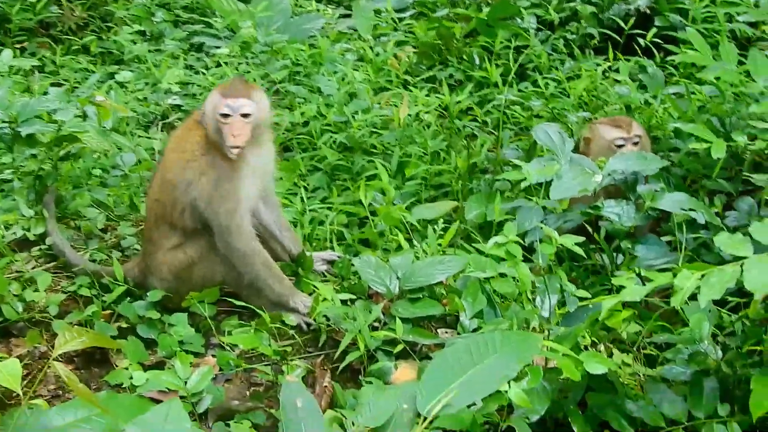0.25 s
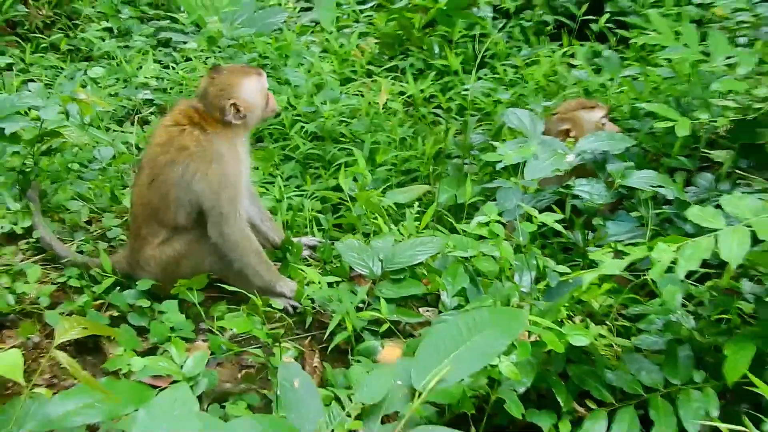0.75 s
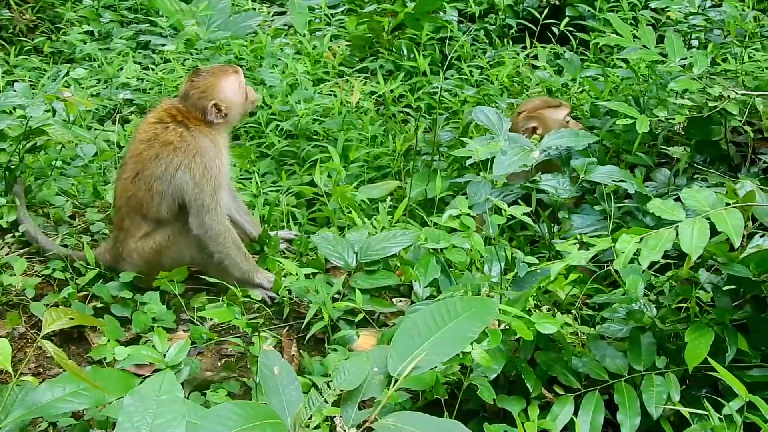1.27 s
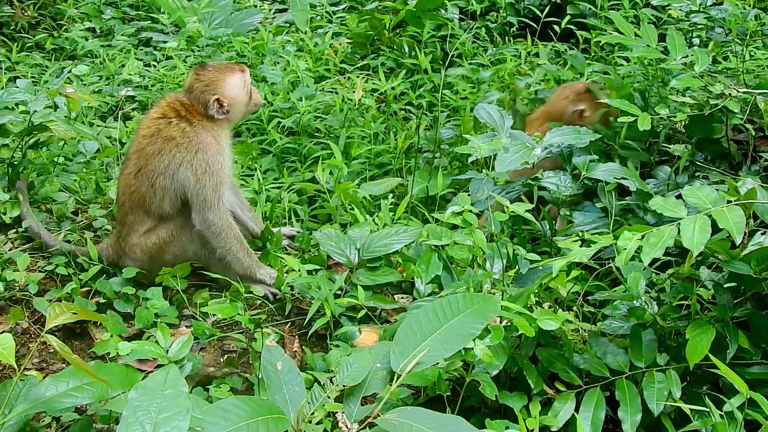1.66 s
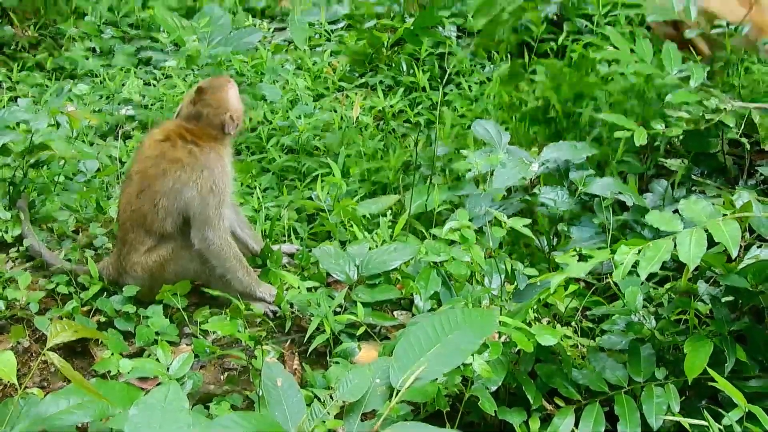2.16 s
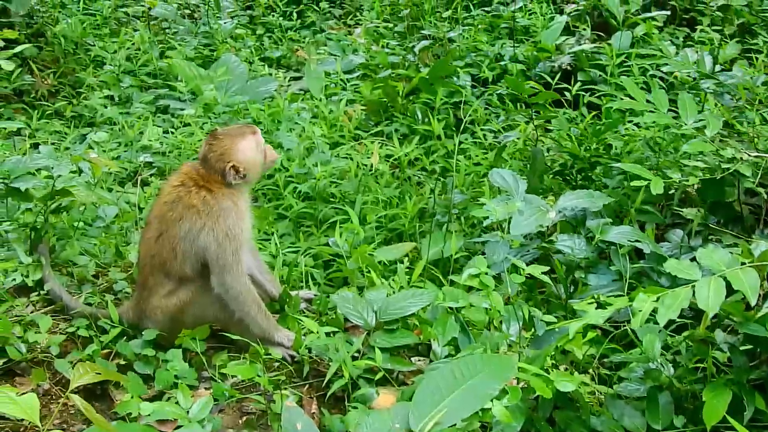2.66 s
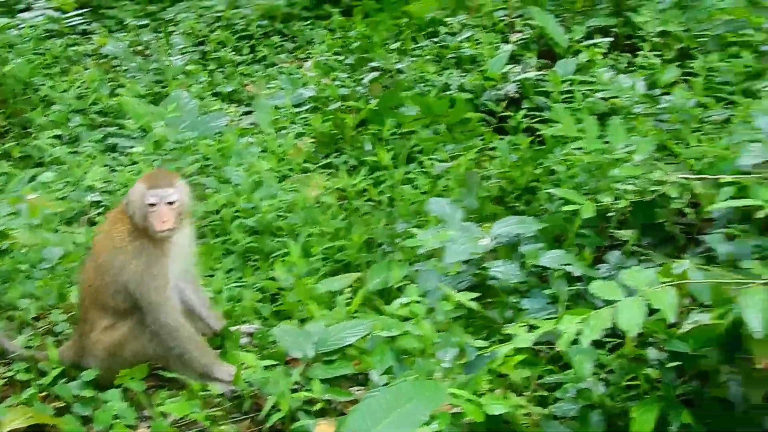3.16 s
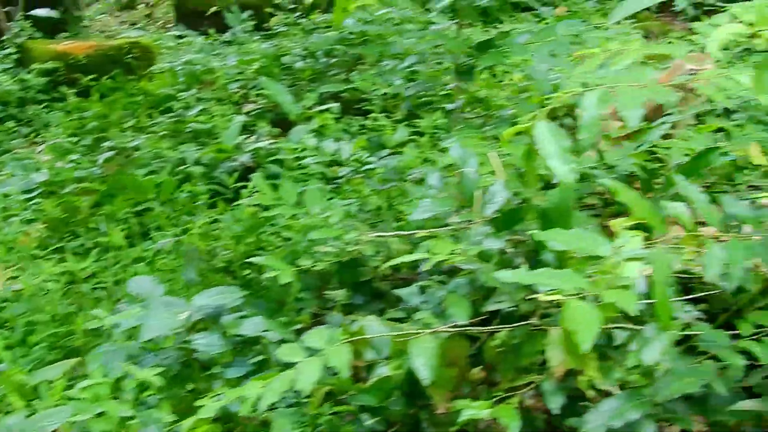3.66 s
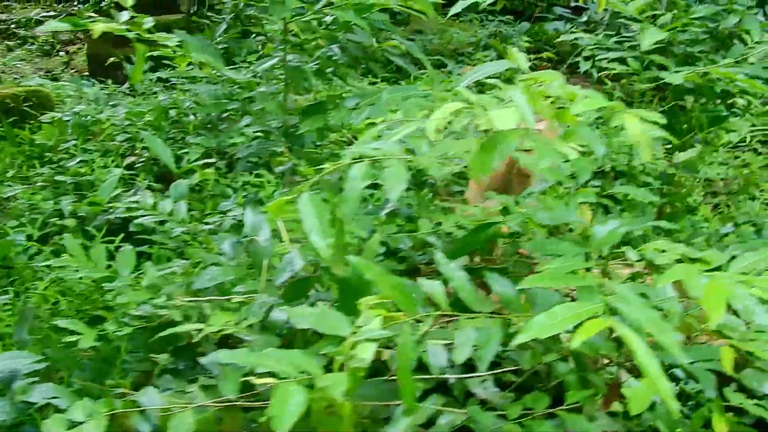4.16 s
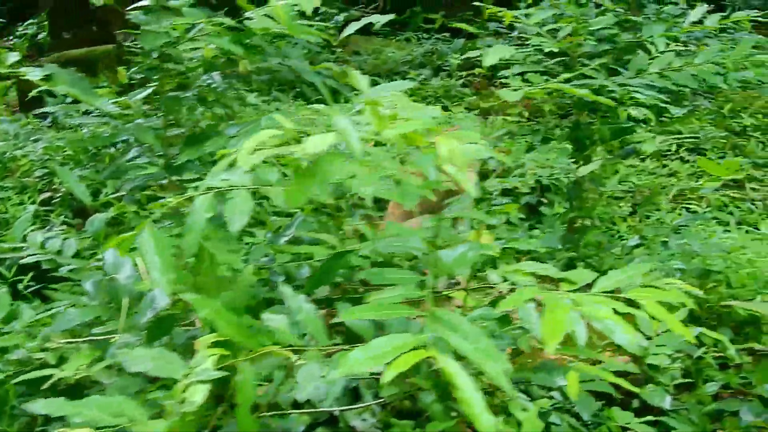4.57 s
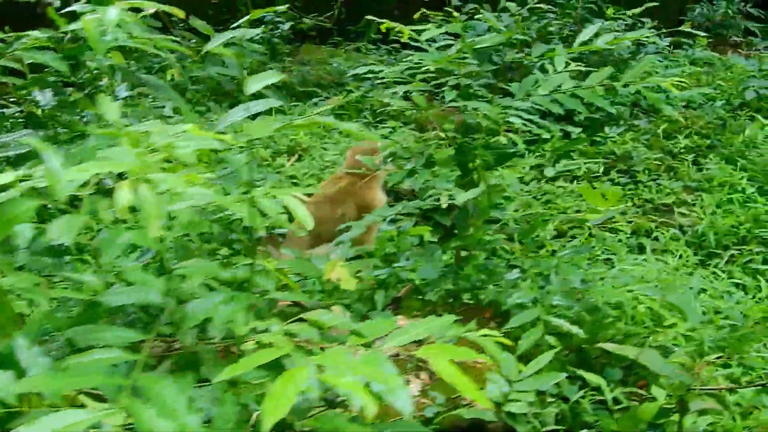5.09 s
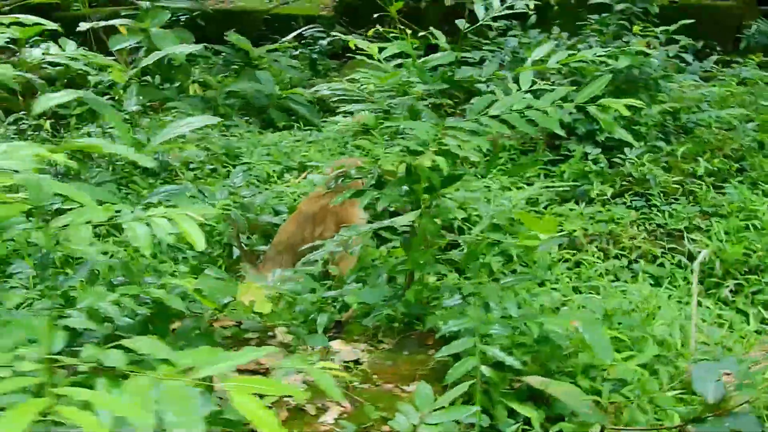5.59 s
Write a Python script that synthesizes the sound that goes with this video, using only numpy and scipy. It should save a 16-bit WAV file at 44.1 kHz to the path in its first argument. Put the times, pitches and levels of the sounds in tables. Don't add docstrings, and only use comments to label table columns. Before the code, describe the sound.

A young monkey shrieks eight times in a forest, thin piercing whistles swooping and breaking into rasp, over a quiet distant engine and small leaf rustles.

```python
import sys
import numpy as np
from scipy import signal
from scipy.fft import rfft, irfft
from scipy.io import wavfile
from scipy.ndimage import uniform_filter1d

SR = 44100
rng = np.random.default_rng(int(sys.argv[2]) if len(sys.argv) > 2 else 0)


def amplitude_ratio(level_db):
    exponent = np.asarray(level_db, float) / 20
    return 10 ** exponent


def persist_wave(psi):
    counts = np.round(np.clip(psi, -1, 1) * 32767).astype(np.int16)
    wavfile.write(sys.argv[1], SR, np.atleast_2d(counts).T)


N = 257103
LEAD = SR // 4


def rms_one(x):
    return x / np.sqrt(np.mean(x ** 2) + 1e-20)


def at_hz(points, hz):
    point_hz, value = np.transpose(points)
    return np.interp(np.log(hz), np.log(point_hz), value)


def in_time(rows, t):
    s, *columns = np.transpose(rows)
    return [np.interp(t, s, c) for c in columns]


def gate(t, start, end, edge_s):
    return np.clip(np.minimum(t - start, end - t) / edge_s, 0, 1)


def filtered(x, order, hz, kind="low"):
    return signal.sosfilt(signal.butter(order, hz, kind, fs=SR, output="sos"), x)


def drift(rate_hz, size=N):
    r = np.exp(-2 * np.pi * rate_hz / SR)
    return rms_one(signal.lfilter([1], [1, -2 * r, r * r], rng.standard_normal(size + SR))[SR:])


def resonant_noise(peaks, size=N, patchy_db=0):
    white, out = rng.standard_normal(size + 4000), 0
    for k, (hz, width_hz, db) in enumerate(peaks):
        r = np.exp(-np.pi * width_hz / SR)
        b, a = [1, 0.002, -1], [1, -2 * r * np.cos(2 * np.pi * hz / SR), r * r]
        swell = amplitude_ratio(db + patchy_db * drift(14.5, size=size))
        ringing = signal.lfilter(b, a, signal.lfilter(b, a, white))[4000:]
        out = out + (-1) ** k * swell * rms_one(ringing)
    return rms_one(out)


def coloured(spectrum, channels):
    hz = np.arange(N // 2 + 1) * SR / N + 1
    return rms_one(irfft(rfft(rng.standard_normal((channels, N))) * amplitude_ratio(at_hz(spectrum, hz)), N))


def spread(mid, side, side_db, pan_db):
    signs = np.array([[1], [-1]])
    return (mid + amplitude_ratio(side_db) * side * signs) * amplitude_ratio(signs * pan_db / 2)


def forest_air():
    # (time [s], level [dB])
    breeze = [(0, -76), (.37, -75.5), (1.88, -76), (2.81, -71), (5.83, -72)]
    # (frequency [Hz], density [dB per Hz])
    air_spectrum = [(250, 2), (500, -1.5), (1000, -1.5), (1500, -3), (2200, -6.5), (3200, -7.5), (5000, -3),
                    (8000, -11.5), (10000, -24), (15000, -32)]
    air_db, = in_time(breeze, np.arange(N) / SR)
    level = amplitude_ratio(air_db - 1.5 + 2.5 * drift(15))
    air, air_side = level * coloured([(150, 0.41)] + air_spectrum, channels=2)
    return spread(air, air_side, -12.0, 0.19)


def engine():
    # (time [s], level [dB])
    engine_curve = [(0, -79.5), (.37, -73), (1.88, -73.5), (2.81, -74.5), (5.83, -75.5)]
    # (frequency [Hz], width [Hz], level [dB])
    drone_peaks = [(101.4, 14, 4), (128.7, 7.4, -1.5), (154.8, 18, -2.5), (186.5, 68, -4)]
    drone_db, = in_time(engine_curve, np.arange(N) / SR)
    deep = amplitude_ratio(drone_db + 0.5) * resonant_noise([(54.7, 3.0, -0.46), (66.4, 14, -0.54)], patchy_db=5.0)
    drone = amplitude_ratio(drone_db) * resonant_noise(drone_peaks, patchy_db=5.0)
    low_side = amplitude_ratio(-92.5) * resonant_noise([(69.5, 46, 26), (164, 56, 25)])
    return spread(deep + drone, low_side, 0, 0.47)


def hums():
    # (start [s], end [s], frequency [Hz], level [dB])
    hum_rows = [
        (3.036, 3.217, 75, -68),
        (3.477, 3.862, 76.1, -70.5),
        (4.101, 4.953, 128.1, -76.5),
        (4.104, 5.9, 159.3, -75.5),
        (4.133, 5.894, 195.6, -80),
    ]
    t, out = np.arange(N) / SR, np.zeros(N)
    for start, end, hz, db in hum_rows:
        level = amplitude_ratio(db + 1.6 * drift(1.04)) * gate(t, start, end, 0.048)
        out += level * np.sin(2 * np.pi * hz * t + 0.84 * drift(1.0))
    return np.sqrt(2) * out


def motor_whine():
    # (time [s], level [dB])
    whine_curve = [(0, -100), (.9, -79.5), (1.2, -74.5), (1.5, -92), (2.8, -72.5), (4.0, -80), (4.5, -69.5),
                   (5.2, -80.5), (5.5, -72.5), (5.83, -74)]
    # (frequency [Hz], level [dB])
    whine_lines = [(332, -14), (663, -18), (994, -19.5), (1329, -11), (1655, -43)]
    t = np.arange(N) / SR
    lines = sum(amplitude_ratio(db + 3.4 * drift(4.9)) * np.sin(2 * np.pi * hz * t) for hz, db in whine_lines)
    return spread(amplitude_ratio(in_time(whine_curve, t)[0]) * lines, 0, 0, 0.47)


def rustles():
    # (time [s], level [dB], centre [Hz], width [octaves], length [s])
    rustle_rows = [(0.484, -67, 817, 3.5, 0.0095), (0.481, -63, 197.7, 0.32, 0.022),
                   (0.72, -56.5, 208, 0.17, 0.037), (0.721, -66, 716, 0.89, 0.048),
                   (0.972, -55.5, 201, 0.19, 0.043), (0.973, -61.5, 652, 0.88, 0.031),
                   (1.024, -68.5, 733, 0.59, 0.026), (2.178, -76, 790, 1.3, 0.11),
                   (2.455, -69.5, 1000, 1.9, 0.093), (2.757, -64.5, 1036, 0.8, 0.077),
                   (2.77, -73, 410, 0.31, 0.064), (3.246, -67, 480, 1.1, 0.0096),
                   (4.362, -70.5, 1313, 0.21, 0.014), (4.399, -71.5, 1370, 0.22, 0.034),
                   (4.406, -66.5, 5600, 0.11, 0.05), (4.409, -71, 6700, 0.26, 0.047),
                   (4.41, -89, 10400, 0.22, .025), (4.414, -74, 2470, 0.36, 0.04),
                   (4.477, -67, 5420, 0.088, 0.047), (4.478, -68, 6700, 0.23, 0.024),
                   (4.475, -70.5, 2400, 0.28, 0.026), (4.598, -74, 1890, 0.13, 0.025),
                   (4.5, -68.5, 835, 2.6, 0.086), (4.529, -65, 5460, 0.41, 0.018),
                   (4.561, -67, 5300, 0.39, 0.007), (4.566, -73, 5300, .3, 0.035),
                   (4.716, -67.5, 1220, 0.38, 0.033), (5.123, -66.5, 946, 0.51, 0.014),
                   (5.316, -73.5, 748, 0.49, 0.07), (5.664, -71.5, 1080, 0.23, 0.051),
                   (5.682, -77, 5940, 0.84, 0.03)]
    out, t = np.zeros(N), np.arange(SR // 5) / SR
    for s, db, hz, octaves, length_s in rustle_rows:
        grains = rng.standard_normal(len(t)) * amplitude_ratio(7 * rng.standard_normal(len(t)))
        band_hz = [hz * 2 ** (-octaves / 2), hz * 2 ** (octaves / 2)]
        swell = 3 * t / length_s * np.exp(1 - 3 * t / length_s)
        puff = rms_one(filtered(grains, 2, band_hz, "band")) * swell
        at = round(s * SR)
        out[at:at + len(t)] += amplitude_ratio(db) * puff[:N - at]
    return spread(out, np.roll(out, 40), -15.5, 0.24)


def trees(x):
    # (frequency [Hz], decay by 60 dB [s])
    trees_t60 = [(1500, .9), (3000, 1.05), (6000, 1.0), (8000, .8), (10000, .65), (14000, .6)]
    onset_s, near_db, near_s = .032, 2, .08
    sway_samples, sway_hz = 13, 30
    sheen = 0.06
    t = np.arange(SR) / SR
    echo, edges_hz = 0, 1000 * 2 ** np.arange(0, 4.1, .5)
    for low, high in zip(edges_hz, edges_hz[1:]):
        band = filtered(rng.standard_normal((2, SR)), 2, [low, high], "band")
        echo = echo + band * amplitude_ratio(-60 * t / at_hz(trees_t60, np.sqrt(low * high)))
    echo *= (1 - np.exp(-(t / onset_s) ** 2)) * (1 + amplitude_ratio(near_db) * np.exp(-t / near_s))
    echo /= np.sqrt(np.sum(echo[0] ** 2))
    i = np.arange(len(x))
    x = np.interp(i + sway_samples * drift(sway_hz, size=len(x)), i, x)
    x = np.convolve(x, [-sheen, 1 + 2 * sheen, -sheen], "same")
    return amplitude_ratio(-12.5) * signal.fftconvolve(x[None], echo, axes=1)[:, LEAD:LEAD + N]


def leaves_near(x):
    taps = np.zeros((2, SR // 250))
    for row in taps:
        row[rng.integers(8, len(row), size=10)] = rng.choice([-1, 1], size=10) / np.sqrt(10)
    return signal.fftconvolve(x[None], taps, axes=1)[:, :N] * amplitude_ratio([[-10], [-8]])


def squeak(s, rise_s, from_hz, top_hz, db):
    return [(s, from_hz, db, .03), (s + rise_s, top_hz, db - 9, .35)]


def fall(s, length_s, from_hz, sag_s, db):
    # (pitch [Hz], roughness [0-1])
    fall_rough = [(2000, .22), (2500, .22), (3000, .5), (3600, .5), (4400, .3), (7000, .25)]
    shelf_hz, end_hz, fade_db = 3100, 1750, 7
    u = np.linspace(0, 1, num=20)
    hz = shelf_hz + (end_hz - shelf_hz) * u + (from_hz - shelf_hz) * np.exp(-u * length_s / sag_s)
    return list(zip(s + u * length_s, hz, db - fade_db * u, at_hz(fall_rough, hz)))


def score():
    # (start [s], rise [s], from [Hz], top [Hz], effort [dB])
    squeak_rows = [
        (1.262, .058, 6400, 9190, -45.5),
        (2.197, .033, 7400, 7750, -55),
        (3.025, .04, 6854, 9346, -57),
        (3.774, .059, 6380, 8890, -43.5),
        (4.712, .058, 6910, 10140, -51),
    ]
    # (start [s], length [s], from [Hz], time constant [s], effort [dB])
    fall_rows = [
        (1.512, .095, 7110, .017, -42),
        (3.263, .112, 6800, .022, -41.5),
        (4.018, .082, 5450, .017, -41),
        (5.105, .1, 6300, .016, -43),
    ]
    # (time [s], pitch [Hz], effort [dB], roughness [0-1])
    broken_falls = [
        [(.124, 8870, -39, 0.32), (.13, 7000, -35.5, 0.17), (.145, 4950, -37.5, 0.13),
         (.154, 4000, -45.5, 0.12), (.17, 3850, -38.5, 0.34), (.18, 2980, -44.5, 0.33),
         (.197, 2426, -41.5, 0.17), (.23, 1940, -59, 0.2)],
        [(.781, 7750, -40, 0.25), (.79, 6316, -35.5, 0.36), (.808, 4200, -45.5, 0.22),
         (.815, 3240, -38.5, 0.35), (.84, 2859, -50.5, 0.4), (.852, 2550, -41, 0.12), (.866, 2336, -47, 0.21),
         (.875, 1977, -52, 0.35), (.895, 1704, -40, 0.42)],
        [(2.243, 7030, -41.5, 0.24), (2.25, 6080, -53, 0.32), (2.256, 4440, -39.5, 0.3),
         (2.263, 4050, -52, 0.6), (2.264, 2590, -36.5, 0.07), (2.271, 2377, -46.5, 0.15),
         (2.281, 2096, -45.5, 0.18), (2.3, 2170, -47, 0)],
    ]
    openings = [
        [(0, 3250, -43, 0.49), (.045, 4480, -45, 0.6), (.048, 6800, -41, 0.35), (.07, 7000, -44, 0.7),
         (.095, 11000, -44, 0.5), (.113, 10200, -50, 0.75), (.116, 7500, -37, 0.2), (.121, 7500, -39, 0.3)],
        [(.531, 7080, -46.5, 0), (.547, 7320, -43.5, 0), (.557, 8570, -44.5, 0.01), (.562, 9300, -55, 0),
         (.575, 10790, -41, 0.06), (.595, 11300, -63, 0.3), (.61, 10770, -46, 0.28), (.626, 9000, -59, 0)],
        [(1.83, 3640, -63.5, 0.29), (1.85, 4600, -54, 0.54), (1.868, 5300, -53.5, 0.42), (1.872, 7000, -56, 1),
         (1.905, 9400, -48.5, 0.49), (1.918, 7200, -50, 0.37), (1.935, 7600, -61, 0.75),
         (1.956, 7400, -46, 0.55)],
        [(2.445, 4613, -53.5, 0.4), (2.46, 7000, -64, 0.85), (2.5, 7370, -55, 0.54), (2.53, 8000, -56.5, 0.55)],
    ]
    swoops = [
        [(.629, 8300, -33.5, 0.08), (.638, 7640, -33, 0.09), (.647, 5510, -43.5, 0.5), (.665, 4440, -40, 0.01),
         (.677, 4030, -45.5, 0.07), (.7, 4232, -42.5, 0.01), (.717, 6180, -44, 0.3), (.725, 5826, -37.5, 0.37),
         (.755, 7000, -47.5, 0.5)],
        [(1.337, 7290, -47.5, 0.37), (1.357, 7440, -41, 0.16), (1.368, 5600, -37, 0.27),
         (1.385, 3200, -43, 0.39), (1.4, 3163, -39, 0.08), (1.435, 4054, -42, 0.09), (1.45, 6340, -40, 0.38),
         (1.475, 6600, -47.5, 1.2), (1.505, 6360, -40.5, 0.23)],
        [(1.967, 7800, -36, 0.04), (1.974, 5700, -37, 0.56), (1.984, 4600, -45, 0.6), (1.985, 2945, -40, 0.38),
         (2.03, 2850, -50.5, 0.38), (2.055, 3000, -54.5, 0.75), (2.057, 6900, -45.5, 0.31),
         (2.083, 7200, -44.5, 0.37), (2.097, 5100, -43, 0.42)],
    ]
    middle_swoops = [
        [(2.108, 4230, -38, 0.51), (2.109, 2790, -43.5, 0.057), (2.135, 2340, -40, 0.018),
         (2.158, 2300, -38, 0.025), (2.172, 2440, -73, 0.23), (2.185, 2400, -73, 0.46)],
        [(2.54, 5920, -38, 0.68), (2.56, 4354, -43, 0.6), (2.578, 4090, -45, 0.29), (2.592, 4480, -45.5, 0.6),
         (2.602, 5700, -43, 0.92), (2.615, 5500, -58, 1), (2.619, 5750, -42, 0.17), (2.633, 6800, -32, 0.32)],
        [(2.648, 6380, -39, 0.67), (2.665, 7500, -45.5, 0.96), (2.69, 6500, -46.5, 1), (2.725, 7270, -48, 0.88),
         (2.76, 6700, -48, 0.92), (2.8, 6500, -47, 0.91), (2.84, 6160, -50, 0.77), (2.9, 6960, -49.5, 0.59)],
        [(3.1, 8900, -55.5, 0.67), (3.12, 7400, -46.5, 0.18), (3.13, 5770, -39.5, 0.32),
         (3.155, 4380, -42, 0.13), (3.17, 3325, -45, 0.57), (3.185, 3750, -43, 0.32), (3.205, 4130, -40, 0),
         (3.218, 6260, -44.5, 0.37), (3.245, 6500, -38, 0.02)],
    ]
    late_swoops = [
        [(3.848, 7500, -40, 0.1), (3.865, 6320, -38.5, 0.2), (3.876, 6750, -39, 0.1), (3.887, 4970, -43, 0.04),
         (3.902, 4080, -44, 0), (3.93, 3978, -46, 0), (3.955, 4250, -45, 0), (3.985, 5500, -43, 0.05),
         (4.0, 5300, -44, 0.15)],
        [(4.79, 8000, -62, 0.71), (4.803, 7710, -44, 0.22), (4.815, 5473, -42, 0.11), (4.835, 3932, -41, 0.53),
         (4.865, 3918, -46.5, 0.58), (4.88, 4900, -31, 0.32), (4.897, 6700, -52.5, 1),
         (4.92, 9950, -48.5, 0.62)],
        [(4.94, 8120, -50.5, 0.72), (4.952, 5675, -34, 0.31), (4.97, 4800, -50, 1), (4.98, 2900, -43.5, 0.51),
         (5.015, 3300, -45, 0.47), (5.05, 4400, -39, 0.46), (5.062, 4900, -47, 0.93), (5.08, 6795, -41.5, 0.72)],
    ]
    # (pitch [Hz], level re effort [dB])
    whistle_speech = [(2000, -10), (2500, -4), (3200, -3), (4500, 0), (7000, -2), (8500, -10), (11000, -20)]
    rasp_speech = [(2000, 14.5), (3000, 11), (4000, 4.5), (5500, -4.5), (8000, 4.5), (11000, -10)]
    clear_gap_db, rough_loss_db = 28, 8
    pause_s = .12
    parts = [squeak(*r) for r in squeak_rows] + [fall(*r) for r in fall_rows]
    parts += broken_falls + openings + swoops + middle_swoops + late_swoops
    s, hz, db, rough = np.transpose(sorted(row for part in parts for row in part))
    rough = np.clip(rough, 0, 1)
    whistle_db = db + at_hz(whistle_speech, hz) - rough_loss_db * rough ** 2
    rasp_db = db + np.minimum(at_hz(rasp_speech, hz) - clear_gap_db * (1 - rough), -2.5)
    rows = np.transpose([s, hz, whistle_db, rasp_db, rough])
    return np.split(rows, np.flatnonzero(np.diff(s) > pause_s) + 1)


def rasp_bands(size):
    # (frequency [Hz], width [Hz], level [dB])
    throat_peaks = [(2220, 310, -25.5), (2810, 300, 1), (3600, 670, -4), (3963, 140, -1.5),
                    (4900, 1630, 8.5)]
    mouth_peaks = [(5600, 190, -12), (6420, 290, 2.5), (6460, 830, 4), (8000, 1400, -7.5)]
    teeth_peaks = [(9140, 2500, -2), (13800, 4000, -23)]
    grit = rms_one(amplitude_ratio(1.5 * drift(500, size=size)))
    throat, mouth, teeth = (resonant_noise(peaks, size, 1.5) * grit
                            for peaks in (throat_peaks, mouth_peaks, teeth_peaks))
    throat, mouth = filtered(throat, 4, 6500), filtered(mouth, 4, 8600)
    place = np.cumsum(1 + .04 * drift(12.0, size=size)) % size
    throat, mouth = (rms_one(np.interp(place, np.arange(size), x)) for x in (throat, mouth))
    return throat, mouth, teeth


def lift(partial_hz, hz):
    # (frequency [Hz], level [dB])
    tract = [(1700, -8), (2300, 6.5), (2800, 15), (3600, 3), (4700, 3.5), (5600, 2.5), (6700, -11.5),
             (8200, -9.5), (10000, -26.5), (11500, -27), (13200, -47), (16000, -48)]
    gain = amplitude_ratio(at_hz(tract, partial_hz) - at_hz(tract, hz))
    return gain / (1 + (np.maximum(partial_hz - hz, 0) / 6000) ** 6)


def locked_thirds(t, turn):
    # (start [s], end [s], two thirds [dB], upper thirds [dB])
    locks = [
        (.663, .688, -14, -22),
        (2.55, 2.592, -5, -22),
        (3.147, 3.165, -10, -20),
        (3.896, 3.952, -9, -7),
        (4.026, 4.045, -9, -25),
        (4.828, 4.86, -9, -18),
    ]
    # (thirds of the pitch, level [dB])
    upper_thirds = [(4, -20), (5, 2), (7, -24), (8, -18), (9, -22), (10, -38), (11, -34)]
    lock, upper_lock = sum(amplitude_ratio([[db], [upper_db]]) * gate(t, start, end, .008)
                           for start, end, db, upper_db in locks)
    upper = sum(amplitude_ratio(db) * np.sin(k * turn / 3) for k, db in upper_thirds)
    return lock * np.sin(2 * turn / 3) + upper_lock * upper


def whistle(t, turn, hz, rough, bright_db, swells):
    # (multiple, level at the larynx [dB])
    overtones = [(2, -14), (3, -9), (4, -11)]
    second_hz, sum_db, difference_db = 3900, -17, -38
    slack = np.clip((3300 - hz) / 400, 0, 1)
    not_limp = np.clip((hz - 2150) / 300, 0, 1)
    voice = np.sin(turn)
    for (k, db), swell in zip(overtones, swells):
        level = amplitude_ratio(db + bright_db * (1 - slack) + 2.0 * np.minimum(swell, .6))
        voice += level * lift(k * hz, hz) * np.sin(k * turn)
    octave = amplitude_ratio(overtones[0][1] + 3 + 2.5 * np.minimum(swells[0], 1)) * slack * not_limp
    voice += octave * lift(2 * hz, hz) * np.sin(2 * turn)
    voice += locked_thirds(t, turn)
    second = 2 * np.pi * second_hz * t
    voice += amplitude_ratio(sum_db) * lift(hz + second_hz, hz) * np.sin(turn + second)
    voice += amplitude_ratio(difference_db) * np.sin(turn - second)
    strands = .7 * rough * np.clip((4200 - hz) / 600, 0, 1)
    return voice * (1 + strands * np.sin(turn / 4))


def streaks(t, turn, start, end, tremor, flutter):
    # (start [s], end [s], throat tone [Hz], level [dB])
    streak_rows = [(0.204, 0.23, 2600, -50), (0.871, 0.887, 2715, -41.5), (2.273, 2.295, 2600, -49),
                   (3.32, 3.356, 2750, -46.5), (3.342, 3.357, 4900, -52.5), (4.07, 4.088, 2520, -50),
                   (4.075, 4.1, 4430, -45), (4.038, 4.045, 3600, -52), (4.08, 4.1, 6500, -60),
                   (3.297, 3.309, 3300, -48), (5.143, 5.165, 2380, -46.5)]
    out = np.zeros(len(t))
    for a, b, throat_hz, db in streak_rows:
        if start < a < end:
            level = np.sqrt(2) * amplitude_ratio(db + 4 * tremor) * gate(t, a, b, .005)
            out += level * (1 + .5 * flutter) * np.sin(turn + 2 * np.pi * throat_hz * t)
    return out


def undertones(t, wobble, tremor, flutter):
    # (start [s], end [s], from [Hz], to [Hz], level [dB])
    undertone_rows = [(0.079, 0.114, 4400, 4360, -61), (0.129, 0.163, 3145, 2360, -53),
                      (0.713, 0.782, 4200, 4200, -58), (0.796, 0.816, 3620, 2790, -48),
                      (1.342, 1.374, 6300, 6080, -52), (1.34, 1.357, 9040, 8860, -59),
                      (1.407, 1.42, 5900, 6660, -50), (2.005, 2.051, 6020, 5600, -51),
                      (2.102, 2.122, 5320, 5730, -46), (3.952, 4.005, 3980, 3890, -67),
                      (4.03, 4.047, 4640, 3956, -49), (4.84, 4.872, 3800, 4000, -48),
                      (3.292, 3.334, 3200, 2810, -50), (1.368, 1.397, 2783, 2486, -50),
                      (1.522, 1.547, 2630, 2440, -55.5), (1.533, 1.55, 6600, 6500, -63),
                      (1.542, 1.597, 4590, 4700, -50.5), (0.804, 0.856, 2300, 2477, -51.5),
                      (1.969, 1.98, 3950, 2850, -37), (2.092, 2.112, 2778, 2820, -41),
                      (2.247, 2.27, 4200, 2700, -51), (2.62, 2.683, 3430, 3340, -63),
                      (2.673, 2.742, 2880, 2877, -52), (2.685, 2.726, 3440, 3470, -45.5),
                      (2.752, 2.785, 3300, 2390, -49.5), (2.791, 2.813, 2910, 2900, -52),
                      (3.145, 3.179, 2910, 2480, -51.5), (3.232, 3.236, 3635, 4120, -63),
                      (3.281, 3.298, 2940, 2530, -61), (4.821, 4.87, 2790, 2620, -69),
                      (4.853, 4.98, 2600, 2770, -79), (4.951, 4.993, 2960, 1980, -54.5),
                      (5.127, 5.15, 3254, 2720, -53)]
    chaos, out = .3, np.zeros(len(t))
    for a, b, from_hz, to_hz, db in undertone_rows:
        on = (t > a) & (t < b)
        hz = np.interp(t[on], [a, b], [from_hz, to_hz]) + 90 * wobble[on]
        level = np.sqrt(2) * amplitude_ratio(db + 4 * tremor[on]) * gate(t[on], a, b, .005)
        smear = np.sqrt(1 - chaos) + np.sqrt(chaos) * flutter[on]
        out[on] += level * smear * np.sin(2 * np.pi * np.cumsum(hz) / SR)
    return out


def screams():
    brightness_db = [-13.5, 9.5, -3, 3, 5, 4.5, 22.5, 1]
    # (time [s], phase [rad])
    snaps = [
        (.118, 2),
        (.786, 2),
        (2.098, 2),
        (2.103, 3),
        (2.117, 1.5),
        (3.958, -3),
        (3.99, 3),
        (4.017, 2),
        (4.952, 2),
    ]
    size = N + LEAD
    t, out = (np.arange(size) - LEAD) / SR, np.zeros(size)
    wobble, tremor = drift(188.6, size=size), drift(39.97, size=size)
    flutter = filtered(drift(352, size=size), 4, 1720)
    throat, mouth, teeth = rasp_bands(size)
    waver = np.roll(tremor, SR)
    skip = sum(step * np.clip((t - s) / .00025, 0, 1) for s, step in snaps)
    swells = [drift(22.0, size=size) for _ in range(3)]
    for rows, bright_db in zip(score(), brightness_db):
        start = rows[0][0] if rows[0][0] > .01 else -.15
        end = rows[-1][0]
        on = (t >= start) & (t < end)
        now = t[on]
        hz, tone_db, rasp_db, rough = in_time(rows, now)
        hz, rough = uniform_filter1d(hz, size=40), np.clip(rough, 0, 1)
        jitter_hz = (50 + .04 * hz) * rough * wobble[on]
        pitch_hz = hz * (1 + .04 * np.minimum(rough, .5) * waver[on]) + jitter_hz
        turn = 2 * np.pi * np.cumsum(pitch_hz) / SR + skip[on]
        voice = whistle(now, turn, hz, rough, bright_db, [swell[on] for swell in swells])
        chaos = rough ** 1.6
        voice *= np.sqrt(1 - chaos) + np.sqrt(chaos) * flutter[on]
        voice *= np.sqrt(2) * amplitude_ratio(tone_db + (1.2 + 3.5 * rough) * tremor[on])
        voice += streaks(now, turn, start, end, tremor[on], flutter[on])
        open_db = 4.95 * (1 - 0.2 * chaos) * np.log2(hz / 4500)
        spray_db = -21 + 12 * np.log2(uniform_filter1d(hz, size=2600) / 4500)
        rasp = amplitude_ratio(-open_db) * throat[on] + amplitude_ratio(open_db) * mouth[on] + amplitude_ratio(spray_db) * teeth[on]
        rasp *= amplitude_ratio(rasp_db - 1.0)
        edge = np.clip(np.minimum((now - start) / 0.0011, (now[-1] - now) / .022), 0, 1)
        out[on] = edge * (voice + rasp)
    out += undertones(t, wobble[::-1], tremor[::-1], flutter[::-1])
    return filtered(out + 1e-18, 6, 1800, "high")


def scene():
    voice = screams()
    tail, tail_side = trees(voice)
    direct = voice[LEAD:]
    early, early_side = leaves_near(direct)
    brighter_left = -.1 * np.gradient(np.gradient(direct))
    side = brighter_left + early_side + 0.79 * tail_side
    side = side - 1.04 * np.roll(early_side + 0.79 * tail_side + brighter_left, 1)
    monkey = spread(direct + early + tail, side, 0, 0.28)
    return monkey + engine() + motor_whine() + forest_air() + rustles() + hums()


def top_cut(x):
    return signal.sosfilt(signal.butter(12, 15300, fs=SR, output="sos"), x)


def record(dry):
    limit_db = -41
    power = uniform_filter1d(np.mean(dry ** 2, axis=0), size=130)
    over_db = np.maximum(10 * np.log10(power + 1e-12) - limit_db, 0)
    cut_db = .75 * uniform_filter1d(uniform_filter1d(over_db, size=100), size=80)
    return top_cut(dry * amplitude_ratio(-cut_db))


dry = scene()
out = record(dry)
persist_wave(out)
```